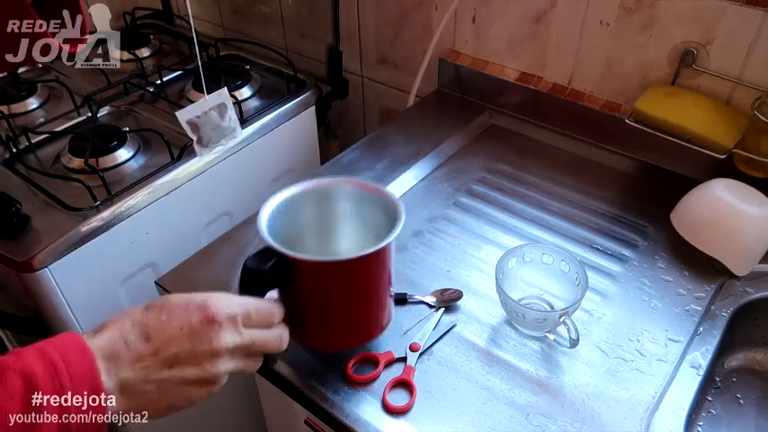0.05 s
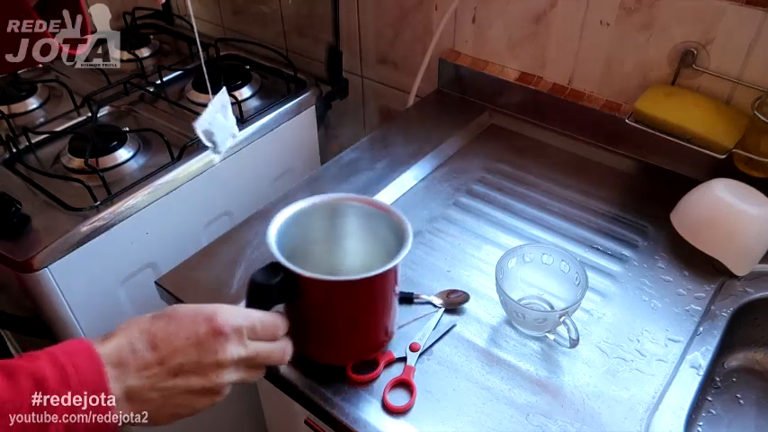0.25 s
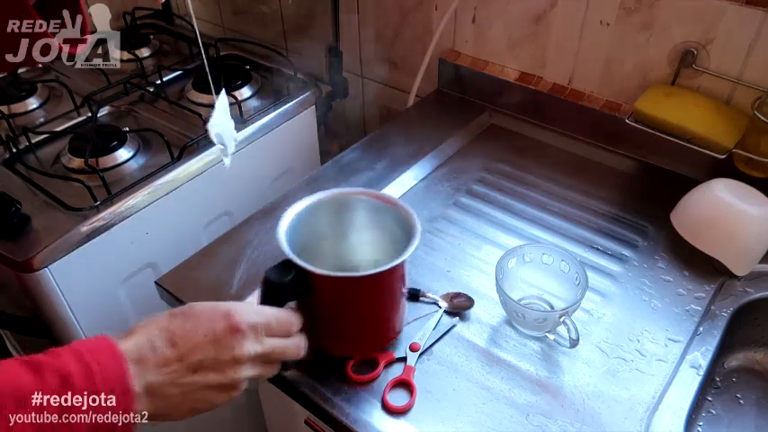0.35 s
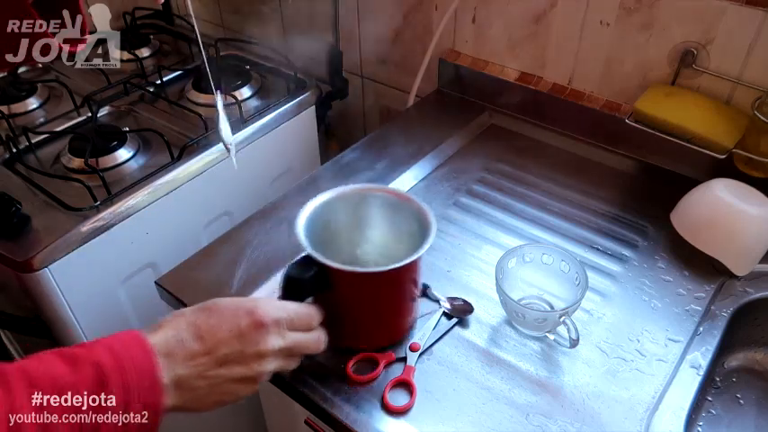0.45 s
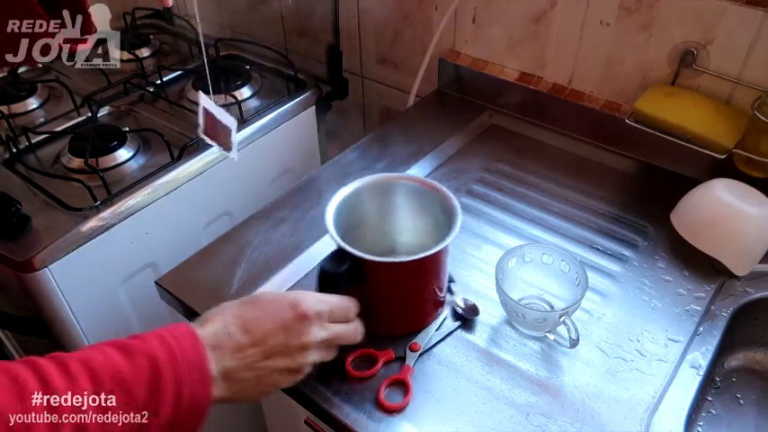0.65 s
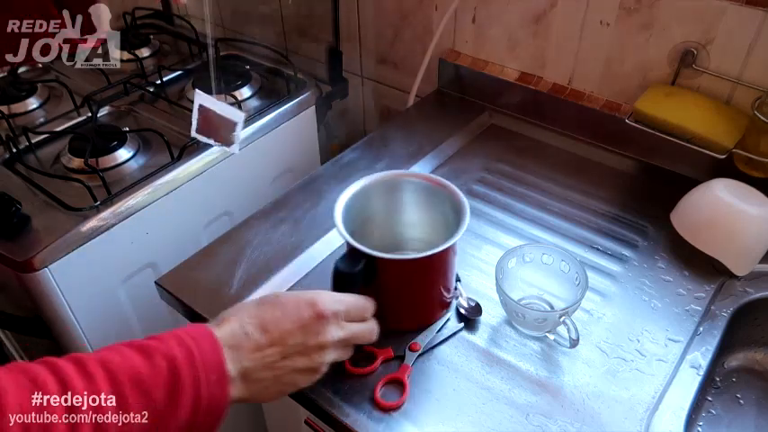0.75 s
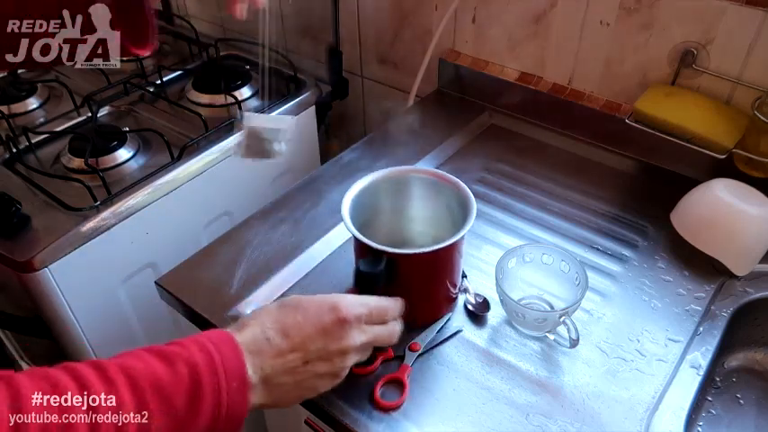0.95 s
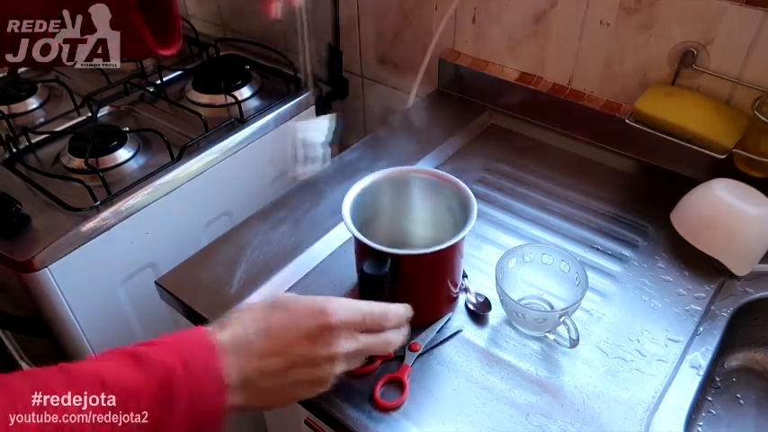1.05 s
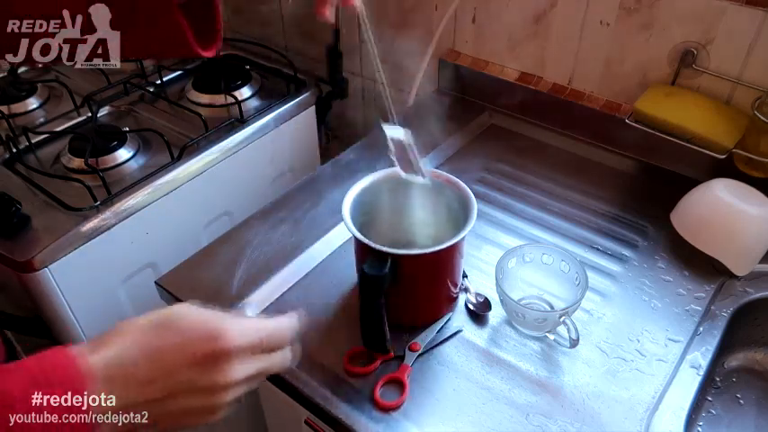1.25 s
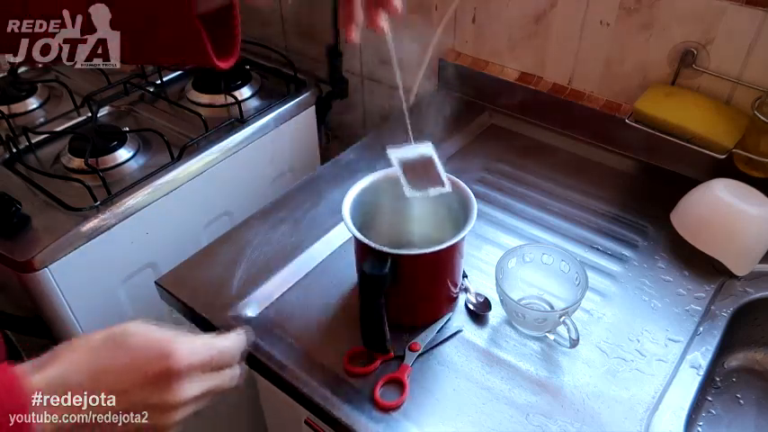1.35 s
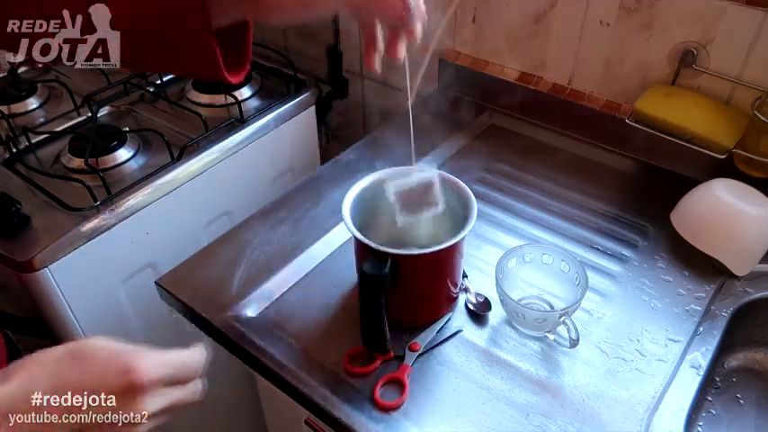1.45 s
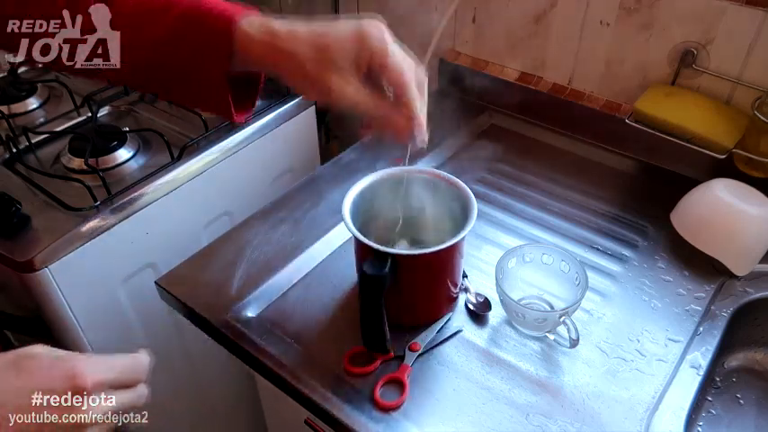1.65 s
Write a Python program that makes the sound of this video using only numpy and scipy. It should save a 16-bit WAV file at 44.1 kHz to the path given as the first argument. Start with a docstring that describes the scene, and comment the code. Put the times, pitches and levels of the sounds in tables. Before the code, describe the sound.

Close stereo pickup in a small, hard-walled kitchen: low appliance hum and faint hiss, a muffled mug thud on sheet steel, gritty rim contact, a brighter hard knock with short echo, later a few faint clicks.

```python
"""An appliance hums over faint room hiss; then a metal mug full of water is set down on a steel counter
in a tiled kitchen: a dull knock, a gritty touch of the rim, a hard knock; later, a few small clicks.
Blows push decaying sine modes of mug and counter plus a noise crack; scrapes are band-passed grains,
clicks short sines, the hum wavering sines, the hiss filtered noise. Echoes and a noise tail make the room."""
import sys
import numpy as np
from scipy import signal
from scipy.io import wavfile
from scipy.ndimage import uniform_filter1d

SR = 44100
rng = np.random.default_rng(int(sys.argv[2]) if len(sys.argv) > 2 else 0)


def store_wav(level_fs):
    """Save 16-bit WAV to argv[1]."""
    pcm = np.round(np.clip(np.atleast_2d(level_fs), -1, 1) * 32767)
    wavfile.write(sys.argv[1], SR, pcm.T.astype(np.int16))


N = 74970


def gain_of(db):
    """Amplitude factor of a level in dB."""
    return 10 ** (np.asarray(db) / 20)


def read(points, hz):
    """Reads a curve of (Hz, value) along a log frequency axis."""
    point_hz, value = np.transpose(points)
    return np.interp(np.log(hz + 1), np.log(point_hz + 1), value)


def coloured(x, points):
    """Linear-phase filter whose gain follows a table of (Hz, dB)."""
    hz = np.linspace(0, SR / 2, 513)
    fir = signal.firwin2(1023, hz, gain_of(read(points, hz)), fs=SR)
    return signal.oaconvolve(x, fir, "same")


def lowpass(x, top_hz, order=2):
    """Butterworth low-pass: a limit on how fast the signal can move."""
    return signal.lfilter(*signal.butter(order, top_hz, fs=SR), x)


def peak(x, hz, q):
    """Resonant band-pass with unit gain at its centre."""
    return signal.lfilter(*signal.iirpeak(hz, q, fs=SR), x)


def place(start_s, sound):
    """Puts a sound into silence of scene length, cut at the end."""
    out = np.zeros(N)
    part = out[round(start_s * SR):][:len(sound)]
    part += sound[:len(part)]
    return out


def swelling_sine(t, hz, db, t60_s, rise_s):
    """One struck mode: exponential swell, then exponential decay."""
    envelope = gain_of(db - 60 * t / t60_s) * (1 - np.exp(-t / rise_s))
    return envelope * np.sin(2 * np.pi * hz * t)


# Spectrum of the room hiss. Each row: frequency in Hz, relative density in dB.
AIR_SPECTRUM = [(30, -38), (90, -8.5), (170, -17.5), (300, -13), (600, -20), (1200, -23), (2500, -28.5),
                (5000, -37), (9000, -44.5), (12000, -47.5), (14500, -58), (16000, -103)]
# Side against mid of the hiss. Each row: frequency in Hz, gain in dB.
AIR_WIDTH = [(60, -32), (110, -69), (200, -11), (380, -5.5), (700, -6.5), (1290, -5), (2380, -4.5),
             (4400, -1.5), (8120, 1), (15000, 3)]
AIR_RMS_DB = -51  # of the mid


def air():
    """Steady room hiss: independent filtered noises for mid and side."""
    mid = coloured(rng.standard_normal(N), AIR_SPECTRUM)
    side = coloured(rng.standard_normal(N), AIR_SPECTRUM)
    side = coloured(side, AIR_WIDTH)
    return gain_of(AIR_RMS_DB) / np.std(mid) * np.array([mid, side])


# Low throb. Each row: time in seconds, frequency in Hz, RMS level in dB before waver.
THROB = [(0.0, 54.5, -39), (0.094, 54.5, -41), (0.226, 54.8, -40), (0.302, 54.8, -35), (0.406, 54.8, -41),
         (0.458, 54.8, -35), (0.582, 54.8, -46), (0.61, 55.3, -40), (0.696, 56.2, -41), (0.894, 56.2, -46),
         (0.98, 57.4, -45), (1.168, 57.4, -39), (1.324, 57.4, -40), (1.396, 58.6, -45), (1.476, 58.6, -48),
         (1.5, 58.6, -56), (1.59, 58.6, -46), (1.7, 58.5, -49)]
# Steadier hum. Each row: time in seconds, frequency in Hz, RMS level in dB before waver.
HUM = [(0, 118.7, -40), (.5, 118.7, -39), (.8, 118.7, -42), (1.1, 118.7, -40), (1.7, 118.7, -39)]
HUM_PARTIAL_RATIO, HUM_PARTIAL_DB = 3 / 2, -17.5
WAVER_DEPTH = .14  # standard deviation of the gain


def hum():
    """Appliance: a low throb and a hum with a faint upper partial, each sine wavering in level."""
    t, out = np.arange(N) / SR, np.zeros(N)
    partials = [(THROB, 1, 0), (HUM, 1, 0), (HUM, HUM_PARTIAL_RATIO, HUM_PARTIAL_DB)]
    for curve, ratio, partial_db in partials:
        time_s, hz, level_db = np.transpose(curve)
        waver = uniform_filter1d(rng.standard_normal(N), size=3000)
        waver = 1 + WAVER_DEPTH * waver / waver.std()
        turns = np.cumsum(ratio * np.interp(t, time_s, hz)) / SR + rng.random()
        amplitude = np.sqrt(2) * gain_of(partial_db + np.interp(t, time_s, level_db))
        out += waver * amplitude * np.sin(2 * np.pi * turns)
    return out


def ring(modes, t):
    """Sum of struck modes; neighbours start in opposite directions."""
    return sum((-1) ** k * swelling_sine(t, *mode) for k, mode in enumerate(modes))


# Blows of the mug. Each row: start in seconds, push level in dB, hardness as top of the push in Hz,
# crack noise level in dB before its filters.
BLOWS = [(0.227, -2.5, 607, -46), (0.4846, -1.5, 8900, -25)]
# Quick modes of mug and counter. Each row: frequency in Hz, relative level in dB,
# T60 in seconds, rise time constant in seconds.
BODY = [(200, -15, .12, .02), (250, -17, .12, .02), (360, -7, .2, .02), (640, -9, .05, .003),
        (700, 1.5, .042, .0006), (880, -14, .05, .004), (1160, -14, .08, .005), (1450, -5, .022, .0002),
        (1900, -12, .018, .0005), (2240, -1, .02, .0002), (2670, -8, .014, .0002), (3220, -3, .02, .0002),
        (4650, -16, .02, .0002), (5440, -22, .016, .0004), (6700, -24, .016, .0004),
        (8080, -32, .02, .0004)]
# Longer rings of the mug wall. Each row: frequency in Hz, relative level in dB,
# T60 in seconds, rise time constant in seconds.
WALL = [(378, -20, .35, .02), (632, -17, .35, .01), (698, -20, .35, .01), (832, -30, .4, .01),
        (1160, -21, .32, .01), (1259, -31, .3, .01), (1358, -24, .33, .01), (1459, -22, .3, .01),
        (1606, -32, .32, .01), (1888, -29, .45, .01), (2169, -32, .5, .01), (2206, -19, .5, .01),
        (2310, -26, .3, .01), (3194, -31, .4, .01), (3650, -38, .6, .01), (4545, -42, .5, .01)]
# Steel sheet's countless close modes as one broad shudder. Each row: frequency in Hz, gain in dB.
SHEET = [(100, -13), (170, -6.5), (300, -6), (450, 0.5), (630, 5), (760, -4.5), (1000, -9.5), (1400, -18.5),
         (1700, -11.5), (2000, -32), (2200, -30), (2450, -5), (2700, -32), (2950, -33), (3200, -14),
         (3450, -36.5), (3700, -11), (4200, -54), (4550, -9), (4800, -25), (5400, -26.5), (5900, -26),
         (6500, -30), (9000, -27), (14000, -44)]
SHEET_DB = 25
CRACK_T60_S, CRACK_LOW_HZ = .016, 8500
CRACK_PEAK_HZ, CRACK_PEAK_Q, CRACK_PEAK_DB = 13300, 5.5, 10


def crack_noise(t, level_db):
    """Contact crack: decaying noise, high-passed, with one treble resonance."""
    crack = rng.standard_normal(len(t)) * gain_of(level_db - 60 * t / CRACK_T60_S)
    crack = signal.lfilter(*signal.butter(2, CRACK_LOW_HZ, "high", fs=SR), crack)
    return crack + gain_of(CRACK_PEAK_DB) * peak(crack, CRACK_PEAK_HZ, CRACK_PEAK_Q)


def mug():
    """Blows push the same modes, a soft one mainly the low ones; returns knocks and sheet shudder."""
    t = np.arange(SR // 2) / SR
    modes = ring(WALL, t) - ring(BODY, t)
    impulse = gain_of(SHEET_DB) * (t == 0)
    knocks, shudder = np.zeros(N), np.zeros(N)
    for start_s, push_db, top_hz, crack_db in BLOWS:
        knock = gain_of(push_db) * lowpass(modes, top_hz)
        knocks += place(start_s, crack_noise(t, crack_db) + knock)
        shudder += place(start_s, gain_of(push_db) * lowpass(impulse, top_hz))
    return knocks, coloured(shudder, SHEET)


# Scrapes of the mug's foot and loose cutlery on the steel. Each row: start in seconds,
# relative level in dB, Gaussian decay length in seconds, centre frequency in Hz.
SCRAPES = [(.2272, -32, .06, 2200), (.2273, -45, .05, 5300), (.263, -35, .007, 3600),
           (.291, -33, .008, 2900), (.4475, -22, .005, 3000), (.448, -26, .006, 1800),
           (.455, -33, .02, 2300), (.514, -25, .011, 3300), (.544, -28, .008, 1500), (.85, -38, .05, 730),
           (.98, -50, .05, 2400), (1.399, -42, .008, 3000), (1.43, -47, .008, 2600)]
SCRAPE_GRAINS_PER_S, SCRAPE_Q, SCRAPE_RISE_S = 7000, 1.5, .0012
SCRAPE_TOP_DB = -39  # open treble


def scrapes():
    """Grit bursts: dense uneven grains through a broad band, plus differentiated grains as treble."""
    t, out = np.arange(SR // 10) / SR, np.zeros(N)
    for start_s, db, length_s, hz in SCRAPES:
        grit = rng.standard_normal(len(t))
        grit = grit * (rng.random(len(t)) < SCRAPE_GRAINS_PER_S / SR)
        grit = grit / grit.std() * np.clip(t / SCRAPE_RISE_S, 0, 1) * np.exp(-(t / length_s) ** 2)
        band = peak(peak(grit, hz, SCRAPE_Q), hz, SCRAPE_Q)
        treble = gain_of(SCRAPE_TOP_DB) * np.diff(grit, prepend=0)
        out += place(start_s, gain_of(db) * (2 * band + treble))
    return out


# Decay of the room. Each row: frequency in Hz, T60 in seconds.
KITCHEN_T60 = [(100, 0.35), (260, 1), (700, 0.83), (1840, 0.68), (4850, 0.57), (12800, 0.39)]
# Colour of the tail. Each row: frequency in Hz, relative level in dB.
KITCHEN_COLOUR = [(100, -26.5), (200, 20), (400, 0.3), (800, 6.1), (1500, 13), (3000, 0.5), (6000, 5.5),
                  (14000, 5.5)]
KITCHEN_DB = 6  # tail energy
BUILD_S = .009  # ramp length, after half as much silence


def tail():
    """Diffuse room tail: noise that dies band by band."""
    hz, t, bands = signal.stft(rng.standard_normal(SR), SR, nperseg=256)
    t60_s = read(KITCHEN_T60, hz)[:, None]
    fade = gain_of(read(KITCHEN_COLOUR, hz)[:, None] - 60 * t / t60_s)
    out = signal.istft(bands * fade, SR, nperseg=256)[1][:SR]
    out = out * np.clip(np.arange(SR) / SR / BUILD_S - .5, 0, 1)
    return gain_of(KITCHEN_DB) * out / np.linalg.norm(out)


# Early echoes. Each row: delay in seconds, signed gain.
ECHOES = [(.0064, .6), (.0098, .6), (.0148, -.3), (.021, .3)]
ECHO_TOP_HZ = 1500
MODES_TO_ROOM_DB = -13


def kitchen(knocks, shudder, small):
    """Dull early echoes and the tail; small sounds come from other spots and get their own tail."""
    dull = lowpass(knocks, ECHO_TOP_HZ)
    echoes = sum(place(delay_s, gain * dull) for delay_s, gain in ECHOES)
    sent = gain_of(MODES_TO_ROOM_DB) * knocks + shudder
    tails = signal.fftconvolve(sent, tail()) + signal.fftconvolve(small, tail())
    return echoes + tails[:N]


# Small clicks. Each row: start in seconds, level in dB before rise and decay, pitch in Hz, T60 in seconds.
CLICKS = [(1.3735, -38, 700, .035), (1.3928, -31, 3200, .004), (1.3929, -30, 1600, .008),
          (1.3996, -29, 3650, .014), (1.3999, -34, 2650, .014), (1.4045, -42, 3700, .02),
          (1.411, -45, 2600, .012), (1.431, -44, 2700, .02)]
CLICK_RISE_S = .00012


def clicks():
    """Tiny dry snaps, each one short inverted ring."""
    t = np.arange(SR // 10) / SR
    return sum(place(start_s, -swelling_sine(t, hz, db, t60_s, CLICK_RISE_S))
               for start_s, db, hz, t60_s in CLICKS)


# Side colour of the near sounds and their room. Each row: frequency in Hz, gain in dB.
WIDTH = [(100, -102), (250, -34), (700, -20), (1500, -18.5), (3000, -11), (5000, -1.5), (8000, 2.5),
         (12000, 8.5), (15000, 0)]
CLICK_ROOM_DB, SCRAPE_ROOM_DB = -12, -6
DIRECT_SIDE_DB, LEAN = -8, -.04  # negative lean: toward the right


def scene():
    """Sums all layers as mid and side, then decodes to left and right."""
    knocks, shudder = mug()
    grit, snaps = scrapes(), clicks()
    mid, side = air()
    direct = knocks + snaps + grit
    small_sent = gain_of(CLICK_ROOM_DB) * snaps + gain_of(SCRAPE_ROOM_DB) * grit
    near = direct + kitchen(knocks, shudder, small_sent)
    mid = mid + near + hum()
    delayed = np.roll(direct, SR // 4000)  # about 0.25 ms
    # A second draw of the tails decorrelates the side.
    spread = gain_of(DIRECT_SIDE_DB) * delayed + kitchen(knocks, shudder, small_sent)
    side = side + LEAN * near + coloured(spread, WIDTH)
    return np.array([mid + side, mid - side])


CEILING = 1.3  # full scale = 1
MIC_TOP_HZ, EDGE_HZ = 14300, 16300


def record(dry):
    """Soft tanh overload, the microphone's treble roll-off, then the band limit."""
    soft = CEILING * np.tanh(dry / CEILING)
    rolled_off = lowpass(soft, MIC_TOP_HZ, order=6)
    band_limit = signal.firwin(511, EDGE_HZ, window=("kaiser", 9), fs=SR)
    return signal.oaconvolve(rolled_off, band_limit[None], "same")


dry = scene()
out = record(dry)
store_wav(out)
```